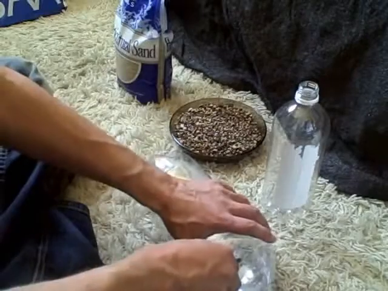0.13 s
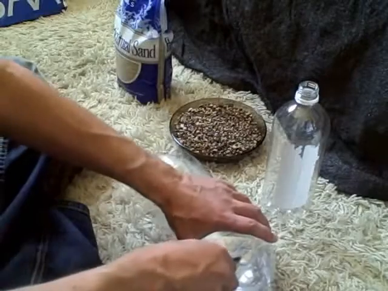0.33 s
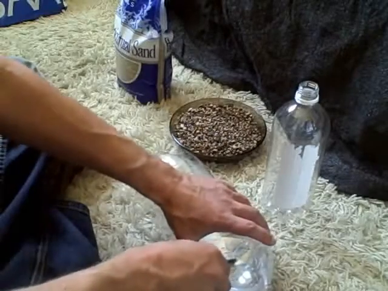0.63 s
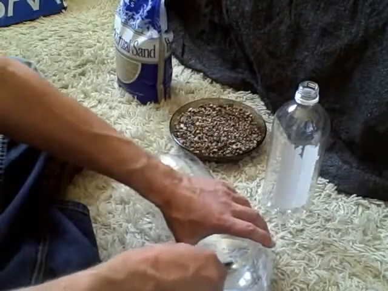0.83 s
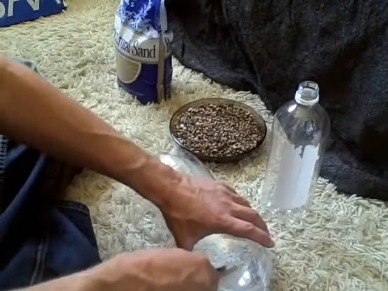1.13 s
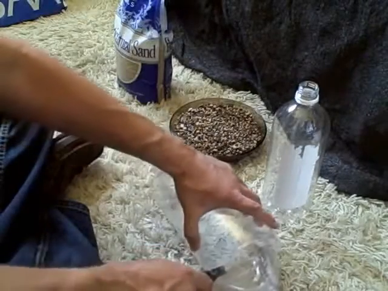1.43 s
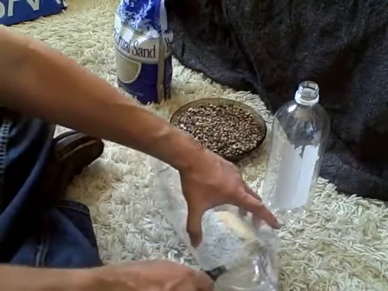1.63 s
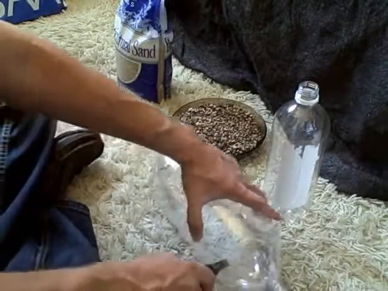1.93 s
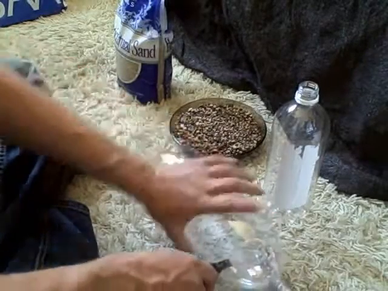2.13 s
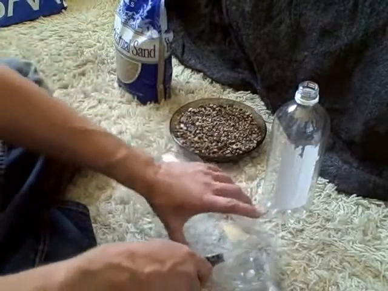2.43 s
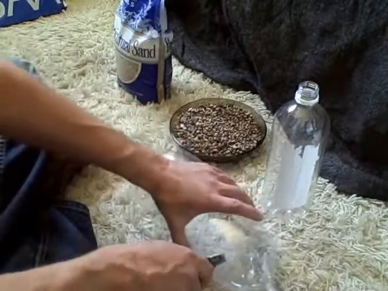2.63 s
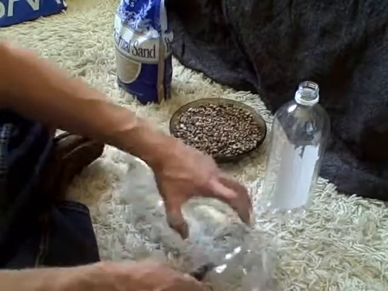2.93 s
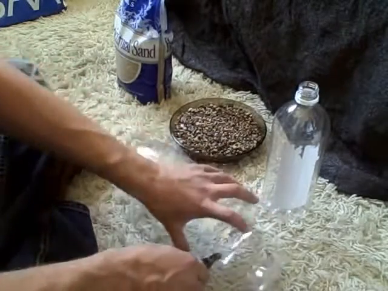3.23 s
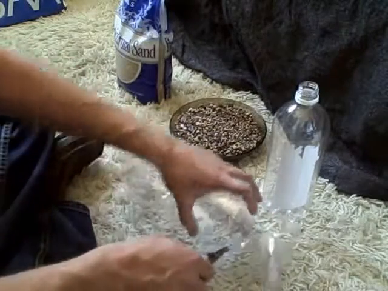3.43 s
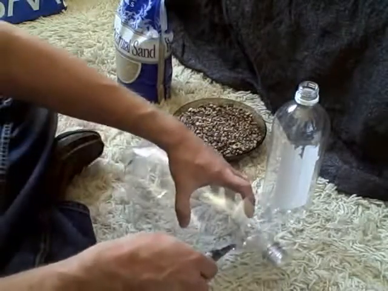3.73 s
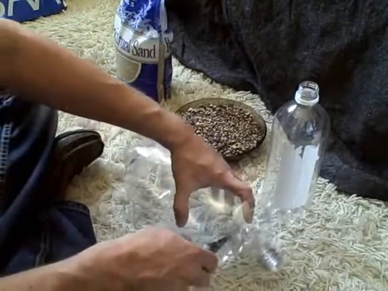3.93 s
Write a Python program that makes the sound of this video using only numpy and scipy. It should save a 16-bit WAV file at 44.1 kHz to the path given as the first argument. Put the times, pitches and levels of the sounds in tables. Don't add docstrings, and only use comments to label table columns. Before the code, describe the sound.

A thin plastic bottle pops, snaps and crackles sharply as hands flex and cut it open close by in a soft, carpeted room.

```python
import sys
import numpy as np
from scipy import signal
from scipy.fft import rfft, irfft, next_fast_len
from scipy.io import wavfile
from scipy.ndimage import map_coordinates

SR = 44100
rng = np.random.default_rng(int(sys.argv[2]) if len(sys.argv) > 2 else 0)


def put_to_file(sound):
    columns = np.atleast_2d(sound).T
    safe = np.clip(columns, -1, 1)
    whole_steps = np.round(safe * 32767)
    wavfile.write(sys.argv[1], SR, whole_steps.astype(np.int16))


def elevation(decibels):
    levels = np.asarray(decibels, float)
    return 10 ** (levels / 20)


N = 180413
TAILS = 6


def unit(x):
    return x / np.sqrt(np.mean(x ** 2) + 1e-20)


def along(points, hz):
    f, v = np.transpose(points)
    return np.interp(np.log(hz + 1), np.log(f + 1), v)


def wobble(rate):
    knots = rng.standard_normal(int(N * rate / SR) + 4)
    return map_coordinates(knots, [np.arange(N) * rate / SR])


def filtered(x, response):
    m = next_fast_len(N + SR // 2)
    return irfft(rfft(x, m) * response(np.fft.rfftfreq(m, 1 / SR)), m)[..., :N]


def peak(f, hz, width):
    return 1j * f * width / (hz * hz - f * f + 1j * f * width)


def ring(modes, t, attack):
    hz, db, t60 = np.transpose(modes)[:, :, None]
    louder_db = 1.5 * rng.standard_normal((len(modes), 1))
    detune = 0.005 * rng.standard_normal((len(modes), 1))
    waves = elevation(db + louder_db - 60 * t / t60) * np.sin(2 * np.pi * hz * (1 + detune) * t)
    return waves.sum(0) * (1 - np.exp(-t / attack))


def silent_paths():
    return np.zeros((TAILS, N + SR))


def add(paths, k, s, wave):
    start = round(s * SR)
    paths[k % TAILS, start:start + len(wave)] += wave


# frequency in Hz, level in dB.
CRACK = [(150, -38), (500, -3), (1500, 1), (3000, -2), (6000, 2), (10000, -8.5), (16000, -12)]


def crack_colour(x):
    return filtered(x, lambda f: elevation(along(CRACK, f)))


# start in seconds, peak in dB, low treble in dB, crackle t60 in seconds.
SNAPS = [(0.0497, -6, -26, 0.041), (0.0644, -17, -28, 0.031), (0.0977, -5, -35, 0.02),
         (0.1454, -16, -10, 0.015), (1.0296, -6.5, -19, 0.12), (1.2665, 18, -22.5, .024),
         (1.4496, -7, -41, 0.018), (1.4654, -14, -40, .022), (1.5366, 1, -48, 0.023),
         (1.5464, 2, -47, 0.017), (1.6192, -11.5, -38, 0.029), (1.7759, -5, -21, .021),
         (1.7799, 1.5, -24, .015), (1.8083, -.6, -28, .021), (2.0318, -12.5, -18, 0.05),
         (2.0946, -15.5, -8, 0.062), (2.3181, -9, -26, 0.057), (2.3304, -2, -25, 0.061),
         (2.3356, 3.5, -41, 0.028), (2.6964, -6.5, -8, 0.056), (2.7064, -24, -20, 0.0055),
         (2.7164, -1.5, -21.5, 0.016), (3.0094, 2, -13, 0.013), (3.0134, -5.5, -17, 0.12),
         (2.9998, -6.5, -23, 0.021), (3.042, -9, -33, .016), (3.1941, -15.5, -20, 0.027),
         (3.1904, -24, -23, 0.0052), (3.688, -1.5, -9, 0.03), (3.7095, -10.5, -3, 0.035)]
# start in seconds, peak in dB, low treble in dB.
TICKS = [(0.0074, -20, -6), (0.1378, -18.5, 3.5), (0.151, -17, -8), (0.19, -15.5, -7), (0.3427, -32.5, -27),
         (0.4178, -26, -30), (1.2308, -24, 1), (1.403, -20, -0.5), (1.499, -21.5, -14), (1.5955, -35, -21),
         (1.717, -53, -24), (1.735, -23, -16), (1.7463, -15, -18), (1.868, -20.5, -30), (2.0433, -25, 10),
         (2.166, -21, -14), (2.2905, -20.5, 2), (2.4473, -17, -19), (2.4707, -17, -16),
         (2.4867, -17.5, -30), (2.6853, -25, -24), (2.778, -28, -21), (2.8501, -16.5, -18),
         (2.9767, -22.5, -23), (3.0977, -18, -11), (3.1156, -23, -9), (3.1258, -30, -22),
         (3.4244, -38, -18.5), (3.4517, -17, -5.5), (3.6679, -24.5, -12)]


def snaps():
    paths, t = silent_paths(), np.arange(SR // 10) / SR
    dull = signal.butter(2, [1500, 3800], "band", fs=SR)
    tick_t60 = 0.028
    rows = SNAPS + [(*tick, tick_t60) for tick in TICKS] + tears()
    for k, (s, db, low_db, t60) in enumerate(rows):
        spikes = rng.standard_normal(len(t)) * elevation(3.57 * rng.standard_normal(len(t)))
        crackle = elevation(-60 * t / max(t60, .002))
        crack = 1.4 * elevation(-60 * t / .005)
        burst = spikes * (crackle + crack) * (1 - np.exp(-t / .0003))
        low_treble = elevation(low_db + 5.5) * signal.lfilter(*dull, burst)
        add(paths, k, s, elevation(db - 17.0) * (burst + low_treble))
    return crack_colour(paths[:, :N])


# first start in seconds, gap in seconds, first level in dB, step in dB.
TEARS = [
    (1.038, .0075, -10, -0.5),
    (1.2745, .0047, -7.5, 2.4),
    (1.305, .009, -6.5, -2),
    (1.7555, .004, -25.5, 3),
    (1.815, .007, -22.5, -18),
    (2.995, 0.0027, -20.5, 3),
    (3.018, 0.0054, -12, -1),
    (3.364, .011, -32, 2),
    (3.441, 0.0018, -28.5, 0),
    (3.716, .009, -28, 0),
]


def tears():
    count, low_db, t60 = 5, -25.5, 0.012
    scatter_db, jitter = 0.5, 0.2
    rows = []
    for first, gap, first_db, step_db in TEARS:
        late, loud = rng.standard_normal((2, count))
        for k in range(count):
            s = first + gap * (k + jitter * late[k])
            db = first_db + step_db * k + scatter_db * loud[k]
            rows.append((s, db, low_db, t60))
    return rows


# start in seconds, wall in dB, wall centre in Hz, hollow in dB.
BUCKLES = [
    (0.007, -33.5, 1270, -3),
    (0.049, -4, 853, -16),
    (0.065, -8.5, 1250, -23),
    (0.097, -3.5, 864, -21),
    (0.134, -24.5, 1220, -23),
    (0.158, -24, 1250, -20),
    (0.19, -27, 1180, -19),
    (0.222, -39, 1220, -29),
    (0.342, -33, 480, 1),
    (0.415, -38.5, 690, -17),
]
BUCKLES_PIERCED = [
    (1.029, -12, 650, -26),
    (1.042, -21, 597, -9),
    (1.266, -13.5, 602, -11.5),
    (1.281, -16.5, 890, -39),
]
BUCKLES_CUT = [(1.452, -36.5, 1040, -3), (1.496, -33, 745, 5), (1.535, -36.5, 950, 3.5),
               (1.546, -23, 860, -19), (1.62, -63, 606, 22), (1.746, -30.5, 860, 5),
               (1.776, -15.5, 1290, 3.5), (1.807, -19, 860, 1), (1.824, -34.5, 850, 3),
               (2.033, -25.5, 605, 0), (2.046, -25.5, 820, -30), (2.092, -30.5, 897, -4),
               (2.294, -35, 1150, -4), (2.32, -28.5, 840, -5), (2.337, -29, 1170, 5),
               (2.449, -41.5, 893, -3), (2.469, -28, 770, -2), (2.486, -26.5, 880, -5),
               (2.697, -22.5, 860, -10), (2.716, -27, 810, 1.5), (2.755, -31.5, 820, -0.5),
               (3.009, -12, 430, 3), (3.013, -16.5, 910, -5), (3.029, -18, 926, -22), (3.041, -36, 950, 2)]
BUCKLES_OPEN = [
    (3.097, -35.5, 664, 2),
    (3.194, -37, 1010, -27.5),
    (3.401, -38.5, 604, 12),
    (3.424, -41, 585, -1),
    (3.452, -43, 910, 15),
    (3.667, -37.5, 970, 10.5),
    (3.69, -15, 1060, 4.5),
    (3.71, -40, 810, -10.5),
]
# hollow frequency in Hz, long ring in dB, rattle in dB.
STAGES = [
    (282, -7.5, -1.5),
    (303.5, -26.5, -0.5),
    (242, -4, -3.5),
    (313, -12, -1.3),
]
# frequency in Hz, level in dB, t60 in seconds.
WALL = [(790, -3, .1), (836, 0, .11), (937, -11, .1), (1190, -8, .1), (1360, -8, .1)]
# ratio to the hollow frequency, level in dB, t60 in seconds.
HOLLOW = [(.78, -3.5, 0.055), (1.004, 10, 0.048), (1.27, -11, 0.14), (1.56, -3, 0.066), (1.92, -6.5, 0.05)]
HOLLOW_OPEN = [(.8, -18.5, 0.045), (1.005, 3.5, 0.067), (1.25, -8, .05)]


def buckles():
    paths, t = silent_paths(), np.arange(SR // 3) / SR
    tables = [BUCKLES, BUCKLES_PIERCED, BUCKLES_CUT, BUCKLES_OPEN]
    rows = [(*row, *stage) for table, stage in zip(tables, STAGES) for row in table]
    for k, (s, db, centre_hz, hollow_db, hollow_hz, long_db, rattle_db) in enumerate(rows):
        edges = [centre_hz / 1.76, min(centre_hz * 1.7, 1550)]
        band = signal.butter(4, edges, "band", fs=SR, output="sos")
        rattle = unit(signal.sosfilt(band, rng.standard_normal(len(t)))) * elevation(-60 * t / 0.089)
        pop = ring([(centre_hz, 0, .008)], t, attack=0.00017)
        long_ring = ring(WALL, t, attack=0.0078)
        modes = HOLLOW_OPEN if s > BREAK[1] else HOLLOW
        hollow = ring(np.array(modes) * [hollow_hz, 1, 1], t, attack=0.0046)
        wave = 0.71 * elevation(rattle_db) * rattle + 2.5 * pop
        wave += elevation(long_db) * long_ring + elevation(hollow_db + 2.0) * hollow
        add(paths, k, s + 0.00074, elevation(db - 3.0) * wave)
    return soft_wall(paths[:, :N])


# start in seconds, peak in dB, frequency in Hz, t60 in seconds.
THUDS = [
    (0.049, -14, 159, 0.046),
    (0.097, -19, 127, 0.053),
    (0.123, -28, 102, 0.21),
    (0.149, -36, 100, 0.16),
    (0.343, -35.5, 109, 0.21),
    (1.025, -30, 132, 0.08),
    (1.264, -30, 131, 0.14),
    (3.688, -33, 108, 0.061),
]


def thuds():
    paths, t = silent_paths(), np.arange(SR // 3) / SR
    for k, (s, db, hz, t60) in enumerate(THUDS):
        add(paths, k, s, ring([(hz, db + 1.5, t60)], t, attack=0.0012))
    return soft_wall(paths[:, :N])


def soft_wall(paths):
    return filtered(paths, lambda f: 1 / (1 + 1j * f / 2300) ** 2)


# time of most pressure in seconds, rasp in dB, hollow rub in dB.
STROKES = [(0.001, -85, -45), (.13, -42.5, -38.5), (.2, -74.5, -59), (.43, -75, -61), (1.0, -73, -63),
           (1.212, -51, -49.5), (1.36, -45.5, -75), (1.47, -82, -49), (1.65, -54.5, -49.5),
           (1.751, -91, -50), (1.97, -79.5, -61), (2.07, -54, -43), (2.31, -80, -53.5), (2.42, -56.5, -55),
           (2.529, -59, -81), (2.61, -62.5, -63), (2.781, -56, -42), (3.03, -79, -40), (3.12, -58, -67),
           (3.408, -54, -46.5), (3.461, -58, -47.5), (3.6, -76.5, -81), (3.75, -61, -59)]
RUB_SHARES = [(.9, 0.83), (1.101, .3)]


def scrape():
    s, rasp_db, rub_db = np.transpose(STROKES)[:, :, None]
    since = np.arange(N) / SR - s
    pressure = elevation(np.minimum(233 * since, -214.5 * since))
    rasp_level = (elevation(rasp_db) * pressure).sum(0) + elevation(-75)
    rub_level = (elevation(rub_db) * pressure).sum(0) + elevation(-63)
    slips = rng.standard_normal(N) * elevation(5.6 * rng.standard_normal(N) + 3.0 * wobble(69))
    rasp = unit(crack_colour(slips))
    resonances = lambda f: np.array([peak(f, 330, 45), peak(f, 245, 35)])
    upper, lower = filtered(rng.standard_normal(N), resonances)
    loose = (np.arange(N) > BREAK[1] * SR).astype(int)
    upper_share, lower_share = np.array(RUB_SHARES)[loose].T
    rub = unit(upper_share * upper + lower_share * lower)
    return rasp_level * rasp + rub_level * rub


# frequency in Hz, t60 in seconds.
ROOM = [(150, 0.12), (800, 0.17), (3000, 0.2), (6000, 0.11), (15000, 0.13)]


def room(paths):
    hz, t, z = signal.stft(rng.standard_normal((TAILS, SR // 2)), SR, nperseg=256)
    decay = elevation(-60 * t / along(ROOM, hz)[:, None])
    tail = signal.istft(z * decay, SR, nperseg=256)[1]
    tail *= 1 - 0.7 * np.exp(-(np.arange(tail.shape[1]) / SR / 0.0077) ** 4)
    tail /= np.linalg.norm(tail, axis=1, keepdims=True)
    delayed = np.pad(paths, ((0, 0), (100, 0)))
    wet = signal.fftconvolve(delayed, tail, axes=1)[:, :paths.shape[1]]
    return paths.sum(0) + elevation(-8.5) * wet.sum(0)


# frequency in Hz, level in dB.
AIR = [(12, -45), (28, -56), (45, -62), (90, -49.5), (130, -56.5), (170, -68.5), (350, -71), (500, -72),
       (1300, -69), (1700, -77), (3500, -89.5), (7000, -103), (16000, -108)]


def room_noise():
    noise = filtered(rng.standard_normal(N), lambda f: elevation(along(AIR, f)))
    return elevation(-48) * unit(noise)


# frequency in Hz, rms in dB, unsteadiness as a share.
HUM = [(18, -32, 0.53), (57.5, -45.5, 0.5), (117, -54.5, 0.93), (328, -62.5, 0.75)]


def fan():
    t, hum = np.arange(N) / SR, np.zeros(N)
    for hz, db, loose in HUM:
        level = elevation(db - 0.5 + 2 * loose * wobble(8.4))
        hum += level * np.sin(2 * np.pi * hz * t + loose * wobble(4.0))
    return hum


# stop in seconds, resume in seconds.
BREAK = (3.068, 3.094)


def scene():
    paths = snaps() + buckles() + thuds()
    stop, resume = (round(s * SR) for s in BREAK)
    gap = np.zeros(resume - stop)
    bottle = np.concatenate([room(paths[:, :stop]), gap, room(paths[:, resume:])])
    return (bottle + scrape() + room_noise() + fan())[None]


# frequency in Hz, width in Hz, gain in dB.
PORT = [(5550, 786, 14.5), (10376, 670, 20), (14800, 990, 6.5)]


def microphone_port(x):
    return filtered(x, lambda f: 1 + sum(elevation(db) * peak(f, hz, width) for hz, width, db in PORT))


# frequency in Hz, rms in dB.
WHINE = [(7682, -82), (8317, -85)]


def electronics():
    t = np.arange(N) / SR
    return sum(elevation(db + 6.5) * np.sin(2 * np.pi * hz * t) for hz, db in WHINE)


def roll_off(x):
    return signal.sosfilt(signal.butter(12, 16110, fs=SR, output="sos"), x)


def record(dry):
    clipped = np.clip(microphone_port(dry) + electronics(), -.9, .9)
    top_hz = 15680
    mix = filtered(clipped, lambda f: np.clip((top_hz - f) / 150 + 1, .012, 1))
    return roll_off(mix)


dry = scene()
out = record(dry)
put_to_file(out)
```